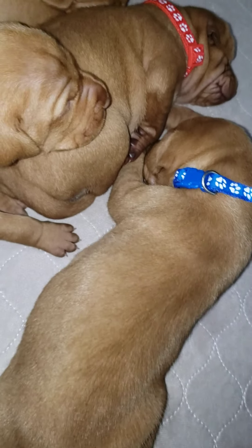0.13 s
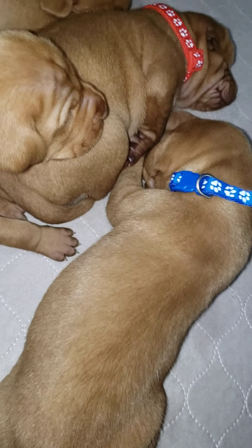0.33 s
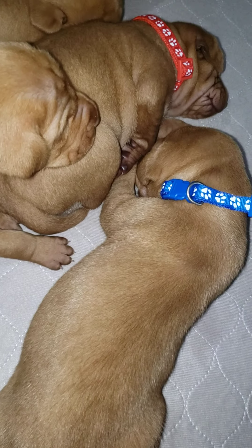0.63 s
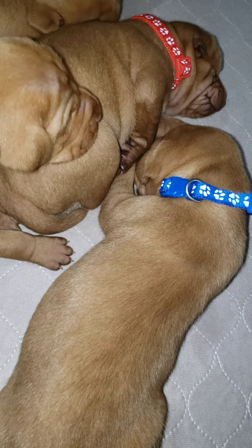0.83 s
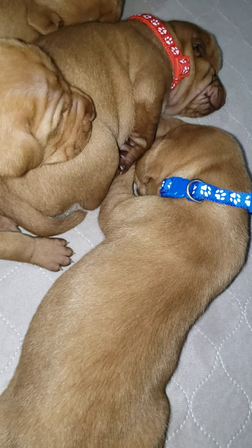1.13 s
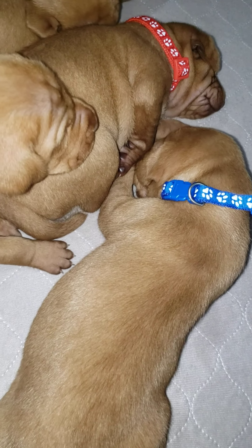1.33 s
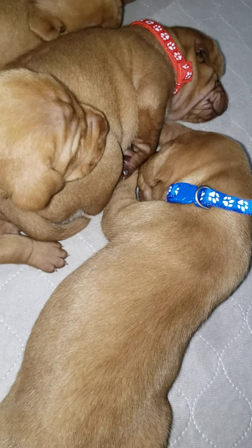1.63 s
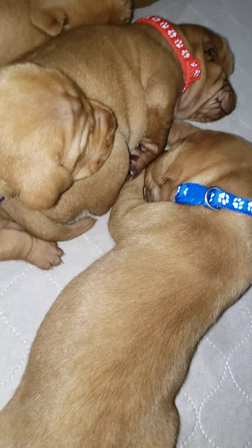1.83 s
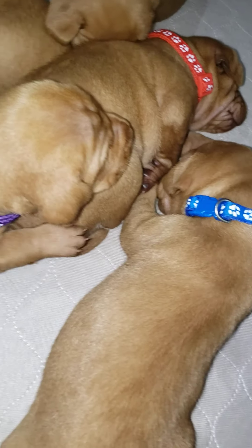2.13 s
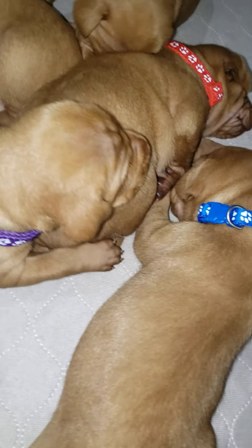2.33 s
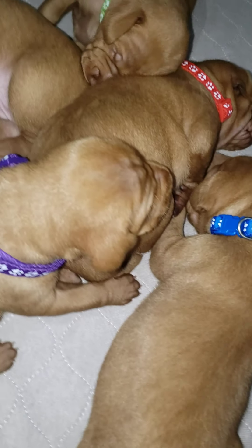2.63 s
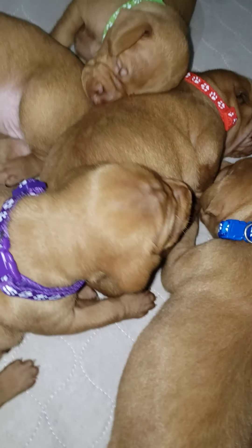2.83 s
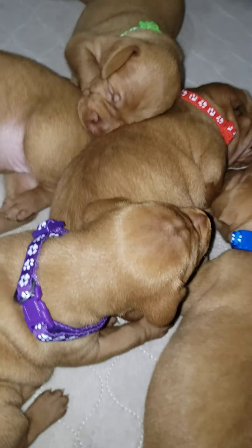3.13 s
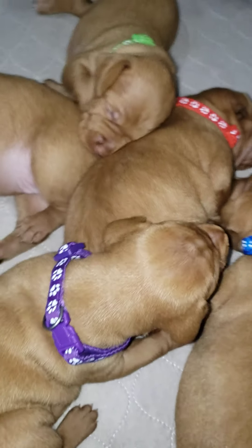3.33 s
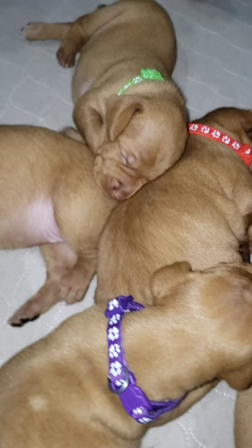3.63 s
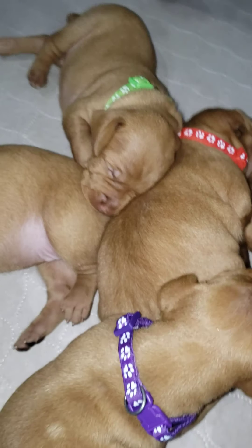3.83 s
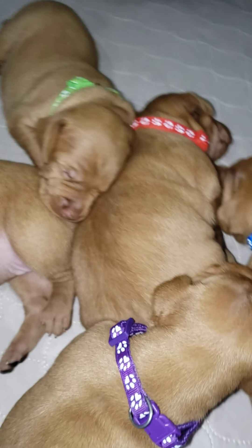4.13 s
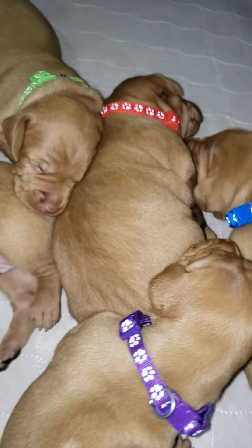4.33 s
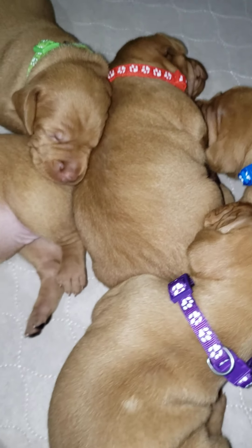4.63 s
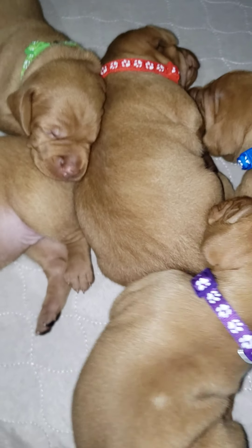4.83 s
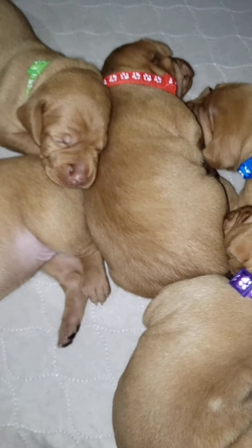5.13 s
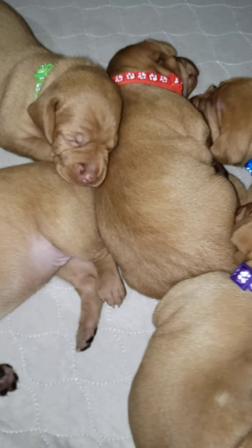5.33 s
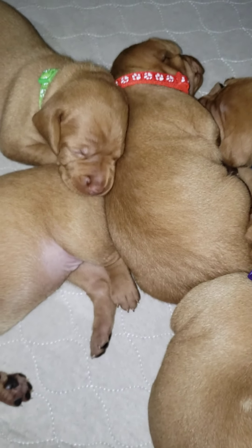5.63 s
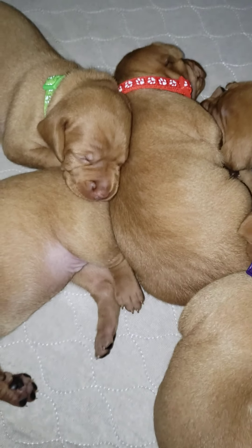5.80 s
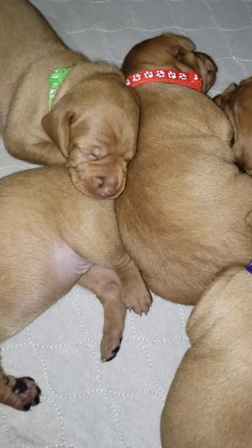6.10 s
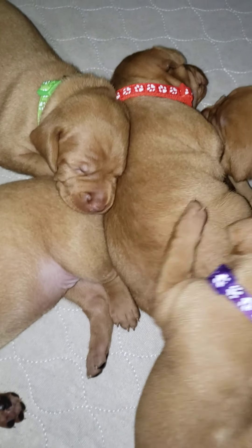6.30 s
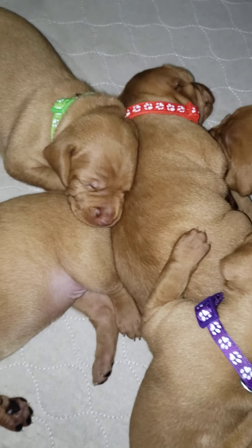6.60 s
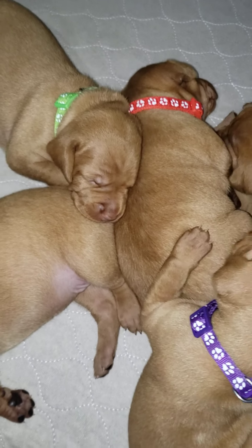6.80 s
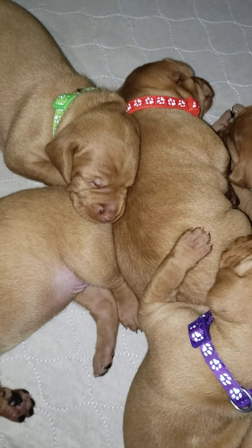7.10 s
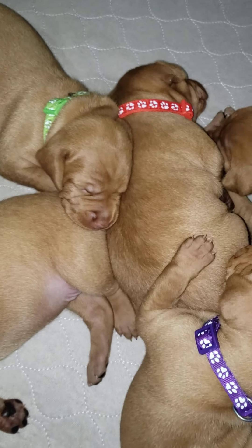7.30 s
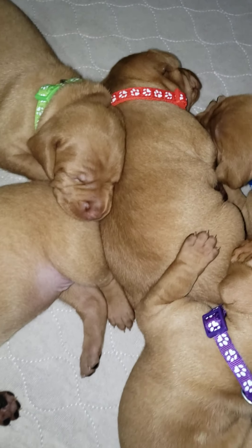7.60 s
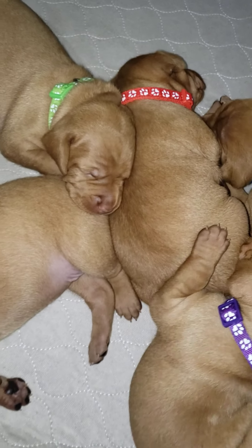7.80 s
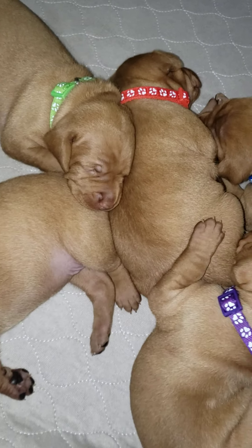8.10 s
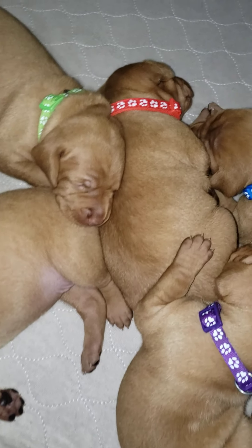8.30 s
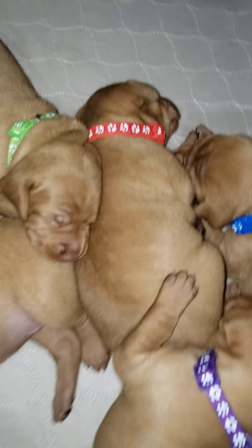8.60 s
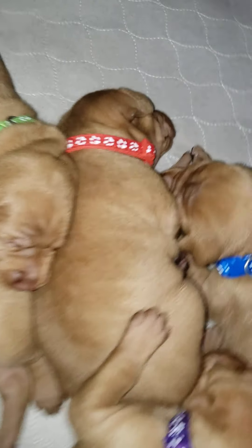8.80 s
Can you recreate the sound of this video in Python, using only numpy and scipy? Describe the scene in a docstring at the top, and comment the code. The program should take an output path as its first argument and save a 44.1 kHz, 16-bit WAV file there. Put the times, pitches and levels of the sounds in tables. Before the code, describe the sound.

Very young puppies lie close to a hand-held phone in a small quiet room. Soft low grunts come first, then a whine and a louder one that breaks and quavers, just as a finger judders over the phone. Small whimpers and fur rustles follow, then a run of short, thin, falling squeaks. A low appliance hum and faint hiss stay underneath.

```python
"""Newborn puppies whimper and squeak on a quilt in a small quiet room, just below a hand-held phone.
Each cry is a sum of harmonics bending in pitch, coloured by a tiny throat and rasped by leaking air;
a second pup grunts in between. Mouth clicks and collar ticks are noise bursts in a resonance.
A delayed near-wall echo ripples their level and a noise tail gives the room. A finger judders once
across the phone near its right port, skin, fur and bedding rustle as shaped noise, an appliance hums."""
import sys
import numpy as np
from scipy import signal
from scipy.fft import rfft, irfft, next_fast_len
from scipy.io import wavfile
from scipy.ndimage import uniform_filter1d

SR = 44100
rng = np.random.default_rng(int(sys.argv[2]) if len(sys.argv) > 2 else 0)


def unload_wav(signal):
    """Save mono or channel-first audio to the path in sys.argv[1] as 16-bit WAV at rate SR, clipped to [-1, 1]."""
    wavfile.write(
        sys.argv[1],
        SR,
        np.round(np.clip(np.atleast_2d(signal).T, -1, 1) * 32767).astype(np.int16),
    )


N = 394674
T = np.arange(N) / SR
SIZE = next_fast_len(N, True)
FREQS = np.fft.rfftfreq(SIZE, 1 / SR)
TOP_HZ = 15850  # upper limit of the phone


def undb(db):
    """Decibels to gain."""
    return 10 ** (np.asarray(db) / 20)


def unit(x):
    """Scale to rms 1."""
    return x / np.sqrt(np.mean(x ** 2))


def curve(rows):
    """Gain over time from (s, dB) rows."""
    return undb(np.interp(T, *np.transpose(rows)))


def colour_db(points, hz):
    """Level of a (Hz, dB) spectrum, interpolated over log frequency."""
    f, db = np.transpose(points)
    return np.interp(np.log(hz + 1e-9), np.log(f), db)


def colour(points, hz):
    """Gain of a (Hz, dB) spectrum at the given frequencies."""
    return undb(colour_db(points, hz))


def shape(x, gain):
    """Filter by a frequency response."""
    return irfft(rfft(x, SIZE) * gain, SIZE)[..., :N]


def resonance(hz, width_hz):
    """Response of one resonance, gain 1 at its centre."""
    return 1j * FREQS * width_hz / (hz ** 2 - FREQS ** 2 + 1j * FREQS * width_hz)


def wander(rate_hz, size=N):
    """Smooth random movement through rate_hz knots a second, scaled toward unit spread."""
    knots = rng.standard_normal(size // 16 + 2)
    return 0.83 * np.interp(np.arange(size) * rate_hz / SR, np.arange(len(knots)), knots)


def pan(x, left_minus_right_db):
    """Place a sound by its level difference, keeping its power."""
    left = 1 / (1 + undb(-left_minus_right_db) ** 2)
    return x * np.sqrt(2 * np.array([left, 1 - left])).reshape(2, -1)


def arch(start_s, top_s, end_s, start_hz, top_hz, end_hz, fall, count=48):
    """Times, pitch and progress of a bend through a rounded top; a high fall exponent holds it longer."""
    t = np.linspace(start_s, end_s, count)
    rising = np.clip((top_s - t) / max(top_s - start_s, 1e-4), 0, 1)
    falling = np.clip((t - top_s) / max(end_s - top_s, 1e-4), 0, 1)
    hz = top_hz + (start_hz - top_hz) * rising ** 2 + (end_hz - top_hz) * falling ** fall
    return t, hz, np.linspace(0, 1, count)


PRESS_DB = -16  # higher harmonics start this much weaker and grow as the pup presses

# Mouth resonance on the second harmonic. Each row: its frequency in Hz, level re fundamental in dB.
MOUTH_RESONANCE = [(1000, -7.5), (1300, -8), (1750, 2), (2100, -11), (2500, -12), (3000, -21), (3400, -42),
                   (3800, -39)]
# Arched squeaks. Each row: start, top and end in seconds, start, top and end pitch in Hz, fall exponent,
# level in dB, higher harmonics in dB before trims, left minus right in dB, hoarseness (clipped to 0-1).
SQUEAK_ROWS = [ (5.864, 5.884, 5.962, 1107, 1080, 767, 1.76, -50, -61.5, -.5, 0.84),
               (6.199, 6.201, 6.265, 1163, 1135, 576, 0.94, -49.5, -59.5, 0.5, 1.1),
               (6.465, 6.518, 6.626, 1090, 1189, 686, 0.93, -40.5, -51, -5.5, 0.07),
               (7.202, 7.276, 7.412, 1500, 1891, 786, 3.32, -36.5, -53.5, -1.5, 0.54),
               (7.571, 7.664, 7.812, 1581, 1852, 1056, 2.72, -39.5, -53.5, 3.5, 0.1),
               (7.952, 8.042, 8.215, 1266, 1740, 596, 1.4, -38.5, -52.5, 0.5, 0.13),
               (8.395, 8.416, 8.44, 888, 896, 710, 1.2, -43.5, -52, -2, 0.18),
               (8.679, 8.69, 8.718, 824, 811, 580, 0.75, -47, -47.5, 2, .8), ]


def squeak(row, soft_start_db=-8, swell_share=0.15):
    """A high cry swells, holds and grows richer as its pitch gives way."""
    *bend, db, higher_db, pan_db, hoarseness = row
    t, hz, progress = arch(*bend)
    level = db + soft_start_db * np.clip(1 - progress / swell_share, 0, 1)
    second = level + colour_db(MOUTH_RESONANCE, 2 * hz)
    higher = higher_db + PRESS_DB * (1 - progress) ** 2
    return t, hz, level, second, higher, pan_db, hoarseness


# Low whimpers and grunts. Each row: start, top and end in seconds, start, top and end pitch in Hz,
# fall exponent, fundamental in dB, its gain from start to end as the mouth closes in dB, second harmonic
# in dB, higher harmonics in dB before trims, left minus right in dB, hoarseness (0-1).
WHIMPER_ROWS = [ (.181, 0.209, .24, 408.5, 444.6, 349, 1.6, -62, 22, -49, -55.5, -4.5, 0.65),
                (1.039, 1.05, 1.066, 425, 394, 377, 1.8, -44, 0, -48, -55, -2, 0.2),
                (1.181, 1.21, 1.26, 410, 394, 341, 2, -54, 3.5, -75, -80, 2.5, 0.2),
                (1.386, 1.455, 1.508, 393, 458.3, 376, 3.5, -54, 7.5, -44.5, -53.5, -6, 0.08),
                (2.69, 2.791, 2.89, 461.4, 557, 425.4, 1.72, -40, -1, -40.5, -43, -1, 0.01),
                (3.144, 3.205, 3.232, 444.3, 523, 440, 1.2, -69, 10, -51, -54.5, -0.5, 0.27),
                (3.463, 3.527, 3.547, 399, 421.7, 332, 1.6, -62, 25, -56, -51, 3, 0.2),
                (3.81, 3.83, 3.845, 318, 325, 253, 1.5, -58.5, 20, -53, -58, 6, 0.74),
                (4.065, 4.125, 4.17, 347, 412.4, 277, 0.67, -59, 16, -55.5, -54, 8.5, 0.65),
                (4.691, 4.7, 4.725, 298, 317, 276, 1.6, -68.5, 0, -62.5, -64, 6, 0.6),
                (5.554, 5.575, 5.6, 295, 322.3, 311, 2.4, -66, -17, -54.5, -58.5, 4, 0.5),
                (6.798, 6.807, 6.88, 389, 350, 316, 0.5, -50.5, -5, -53, -62.5, 2.5, 0.3),
                (7.295, 7.323, 7.37, 422, 422, 332, 2.34, -53.5, 8, -55, -63, 4, 0.3),
                (7.94, 7.945, 7.975, 408, 393, 352, 2, -54.5, 6, -73, -70, 6, 0.3), ]


def whimper(row, edge_db=-7, edge_higher_db=-7.5):
    """A low cry is weaker at its edges; its fundamental shifts in level as the mouth closes."""
    *bend, first_db, closing_db, second_db, higher_db, pan_db, hoarseness = row
    t, hz, progress = arch(*bend)
    edge = (2 * progress - 1) ** 2 - 1 / 3  # zero mean, ends 1 above the middle
    first = first_db + edge_db * edge + closing_db * (progress - .5)
    second = second_db + edge_db * edge
    higher = higher_db + edge_higher_db * edge
    return t, hz, first, second, higher, pan_db, hoarseness


# Whines that catch or quaver on the way down, one list each.
# Each row: time in seconds, pitch in Hz, level in dB.
WHINE_CURVES = [
    [(1.752, 1226, -51.5), (1.797, 1527, -42), (1.83, 1417, -40.5), (1.868, 1422, -37.5),
     (1.885, 1236, -39), (1.897, 887, -39.5), (1.91, 770, -48.5)],
    [(2.097, 1193, -41), (2.125, 1418, -30), (2.15, 1553, -33), (2.215, 1218, -33), (2.26, 825, -37),
     (2.305, 710, -47), (2.325, 622.4, -31), (2.408, 570.6, -40), (2.43, 668, -29.5), (2.455, 630.4, -33),
     (2.478, 661, -34.5), (2.497, 581, -34.5), (2.518, 632, -36.5), (2.534, 488, -41.5)],
    [(6.83, 1175, -48.5), (6.85, 1190, -40), (6.875, 1467, -41), (6.895, 1488, -33.5), (6.915, 1372, -40),
     (6.932, 1168, -35), (6.955, 1013, -37.5), (7.007, 880, -35), (7.018, 667, -38.5)],
]


def whine(rows, higher_db=-14.5, pan_db=-3, hoarseness=.25):
    """A drawn-out squeak that follows its own curve of pitch and level."""
    t, hz, db = np.transpose(rows)
    progress = (t - t[0]) / (t[-1] - t[0])
    second = db + colour_db(MOUTH_RESONANCE, 2 * hz)
    higher = db + higher_db + PRESS_DB * (1 - progress) ** 2 / 2  # half the press of a squeak
    return t, hz, db, second, higher, pan_db, hoarseness


def fold_pitch(pitch, slack, rattle, jitter=0.0026, slack_jitter=.011, rattle_jitter=.04, rattle_waver=.018):
    """Slack folds vibrate less evenly than taut ones, and hoarse ones rattle: relative pitch jitter."""
    count = len(pitch)
    quiver = wander(900, count)
    unsteady = rattle * (rattle_jitter * quiver + rattle_waver * wander(72.8, count))
    return pitch * (1 + jitter * wander(112, count) + slack_jitter * slack * quiver + unsteady)


# Throat and nose on the higher harmonics. Each row: frequency in Hz, relative level in dB.
THROAT_COLOUR = [(900, 19.5), (1350, 10), (1800, 10.5), (2400, 4.5), (3400, -20), (5500, -14.5), (7000, -6),
                 (8200, -15.5), (9400, -15), (11300, -0.5), (13200, -13), (15500, -21.5)]


def throat_gains(overtones_hz, hz, slack, shrill, higher_db, upper_db=-1, nasal_db=-7, shrill_db=5):
    """Throat and nose set each higher harmonic's amplitude; slack folds feed the topmost less."""
    throat = colour(THROAT_COLOUR, overtones_hz) * (overtones_hz < TOP_HZ)
    # low grunts carry less thin nasal treble
    throat = throat * undb(nasal_db * (overtones_hz > 4000) * 500 / hz)
    # high squeaks ring the nose's top resonance harder
    throat = throat * undb(shrill_db * shrill * (overtones_hz > 8500))
    higher = throat / np.sqrt(np.sum(throat ** 2, axis=0)) * undb(higher_db + upper_db)
    higher = higher * (1 - .7 * slack * np.clip((overtones_hz - 2000) / 2000, 0, 1))
    # each harmonic flickers on its own
    flicker = wander(60, higher.size).reshape(higher.shape)
    return higher * undb(2.5 * flicker - 1)


# Right-port lag of the cries as the pups turn their heads. Each row: time in seconds, lag in seconds.
PORT_LAG_CURVE = [(0.2, 0.00013), (1.05, 0.00018), (1.4, 0.00023), (2.1, 0.00025), (3.5, 0.00023),
                  (6.83, 0.00032), (7.2, 0.00043), (7.57, .00014), (7.95, 0.00032)]


def cry(s, pitch, first_db, second_db, higher_db, pan_db, hoarseness, taut_hz=1400, glide_s=.006,
        attack_s=.007, release_s=0.0061, shimmer_db=3.5, collapse_s=0.1, flutter_db=1.5,
        rattle_flutter_db=3, slack_rasp_db=9, shrill_rasp_db=4):
    """Folds make 40 harmonics and leak air: high squeaks are nearly pure, low whines waver and rasp."""
    start, end = s[0] - attack_s, s[-1] + release_s
    span = slice(int(start * SR), int(end * SR))
    t = T[span]
    lag_s = np.interp(start, *np.transpose(PORT_LAG_CURVE))
    pitch, first_db, second_db, higher_db = (
        uniform_filter1d(np.interp(t, s, control), int(glide_s * SR), mode="nearest")
        for control in (pitch, first_db, second_db, higher_db))

    slack = 1 / (1 + (pitch / taut_hz) ** 6)
    shrill = np.clip(pitch / 500 - 1, 0, 1)
    rattle = np.clip(hoarseness, 0, 1) * slack
    hz = fold_pitch(pitch, slack, rattle)
    k = np.arange(1, 41)[:, None]
    higher = throat_gains(k[2:] * hz, hz, slack, shrill, higher_db)
    amplitudes = np.vstack([undb(first_db), undb(second_db), higher])

    gate = np.clip((t - start) / attack_s, 0, 1) * np.clip((end - t) / release_s, 0, 1)
    # the folds flutter hardest while the pitch collapses
    collapse = np.clip(-np.gradient(np.log(pitch)) * SR * collapse_s, 0, 1)
    flutter = flutter_db * slack * collapse ** 2 + rattle_flutter_db * rattle
    gate = gate * undb(shimmer_db * wander(117.7, len(t)) + flutter * wander(600, len(t)))

    phase = 2 * np.pi * np.cumsum(hz) / SR
    voice, air = np.zeros((2, N)), np.zeros(N)
    for port, lag in enumerate((0, lag_s)):
        harmonics = np.sin(k * (phase - 2 * np.pi * hz * lag))
        voice[port, span] = np.sqrt(2) * np.sum(amplitudes * harmonics, axis=0) * gate
    voice[:, span] = pan(voice[:, span], pan_db)
    # air leaks once a cycle, more through slack folds
    leak_db = higher_db + slack_rasp_db * (slack - 2.5) + shrill_rasp_db * shrill * slack
    air[span] = undb(leak_db) * gate * (1 + np.cos(phase))
    return voice, air


def puppies(rasp_bright_db=8):
    """All cries; leaking air makes noise that passes through the same throat, brightened."""
    voice, air = 0, 0
    cries = [*map(squeak, SQUEAK_ROWS), *map(whimper, WHIMPER_ROWS), *map(whine, WHINE_CURVES)]
    for controls in cries:
        tone, leak = cry(*controls)
        voice, air = voice + tone, air + leak
    bright = undb(rasp_bright_db * FREQS / TOP_HZ)
    bass_cut = FREQS / (FREQS + 500)
    gain = colour(THROAT_COLOUR, FREQS) * bright * bass_cut
    rasp = shape(air * rng.standard_normal((2, N)), unit(gain))
    return voice + rasp


# Wet mouth clicks and collar ticks.
# Each row: start in seconds, peak before panning in dB, centre in Hz, decay in seconds.
TICK_ROWS = [(.394, -51.5, 2230, 0.00078), (1.09, -63.5, 5900, 0.0022), (2.73, -42, 3265, 0.012),
             (2.785, -46, 4200, 0.009), (3.638, -63, 1500, .002), (3.771, -51.5, 2280, 0.0039),
             (4.883, -53, 14900, 0.034), (4.879, -50.5, 3500, 0.014), (8.59, -55, 1150, 0.0014)]


def ticks(relative_width=0.28, pan_db=-6):
    """Small clicks, each a decaying noise burst in one broad resonance."""
    out = 0
    for s, db, hz, decay_s in TICK_ROWS:
        decay = np.exp(-np.clip((T - s) / decay_s, 0, 20))
        burst = rng.standard_normal(N) * (T > s) * decay
        click = shape(burst, resonance(hz, hz * relative_width))
        out = out + undb(db) * click / np.max(np.abs(click))
    return pan(out, pan_db)


def pen_wall(x, left_s=0.00393, right_s=0.002434, left_db=-10, right_db=-7, dull_hz=4000):
    """A near wall echoes to each port; a gliding cry ripples as the echo adds and cancels."""
    delay_s = np.array([[left_s], [right_s]])
    echo = undb([[left_db], [right_db]]) * np.exp(-2j * np.pi * FREQS * delay_s)
    return shape(x, echo / (1 + (FREQS / dull_hz) ** 2))


def room(x, wet_db=-13, t60_s=0.55, dull_hz=3500, early_db=-15, early_s=0.026):
    """Near reflections from the pen and the room's short tail: decaying noise, dulled."""
    t = T[:SR // 2]
    noise = rng.standard_normal((2, 2, len(t))) * (t > .003)
    tail = noise[0] * undb(-60 * t / t60_s)
    early = noise[1] * np.exp(-t / early_s)
    response = (undb(wet_db) * unit(tail) + undb(early_db) * unit(early)) / np.sqrt(len(t))
    wet = signal.fftconvolve(x, response, axes=1)[:, :N]
    return shape(wet, 1 / (1 + 1j * FREQS / dull_hz))


# Finger on the case, sticking and slipping.
# Each row: time in seconds, strength before trims in dB, tick before panning in dB.
SLIP_ROWS = [(1.9175, -27, -42), (1.9579, -21, -23), (1.9805, -20, -23.5), (2.0007, -19.5, -22),
             (2.0198, -19, -22), (2.0386, -18.5, -23), (2.0565, -19.5, -19.5), (2.0755, -19, -21.5),
             (2.0927, -20, -22), (2.1088, -21, -21.5)]
# Skin on the phone. Each row: frequency in Hz, relative level in dB.
SKIN_COLOUR = [(300, -0.5), (1000, -4.5), (2500, -8), (4500, -5.5), (5900, -3.5), (7800, -11), (9500, -4.5),
               (12200, -15), (13500, -6.5), (14700, 3.5), (15800, -24)]


def judder(case_hz=84, case_db=-0.5, swell_s=0.0037, give_s=0.00042,
           panel_hz=240, panel_db=-15, panel_s=0.0069, tick_s=0.00013,
           fizz_db=-24, fizz_s=0.0017, pan_db=-14):
    """Each slip snaps a tick, rocks the case, rings a panel and fizzes while the skin slides."""
    knock, slide = np.zeros(N), np.zeros(N)
    for s, db, tick_db in SLIP_ROWS:
        span = slice(int(s * SR) - SR // 200, int(s * SR) + SR // 20)
        t = T[span] - s
        late = np.maximum(t - give_s, 0)
        swell = late / swell_s * np.exp(1 - late / swell_s)
        knock[span] += undb(tick_db) * np.exp(-(t / tick_s) ** 2)
        knock[span] -= undb(db + case_db) * np.sin(2 * np.pi * case_hz * late) * swell
        knock[span] -= undb(db + panel_db) * np.sin(2 * np.pi * panel_hz * late) * np.exp(-late / panel_s)
        since = np.maximum(t, 0) / fizz_s
        slide[span] += undb(db + fizz_db) * since * np.exp(1 - since)
    skin = unit(shape(rng.standard_normal(N), colour(SKIN_COLOUR, FREQS)))
    return pan(knock + slide * skin, pan_db)


def friction(gain, grain_db=2.0, flutter_db=2.5):
    """Countless tiny catches: noise of uneven level ringing the given response."""
    uneven = undb(grain_db * wander(900) + flutter_db * wander(25))
    return unit(shape(rng.standard_normal((2, N)) * uneven, gain))


# Skin sliding on the phone. Each row: time in seconds, level in dB.
GRIP_LEVEL = [(0, -112), (1.7, -99), (1.93, -69.5), (2.1, -54), (2.25, -49), (2.5, -54), (2.85, -56.5),
              (2.97, -66.5), (3.3, -72.5), (3.6, -64), (4.0, -105), (8.4, -82), (8.95, -72)]
# Fur on the quilt. Each row: frequency in Hz, relative level in dB.
FUR_SPECTRUM = [(300, 0.5), (1200, -2.5), (2600, 1), (4200, -1), (6000, -5), (8500, -10.5), (11000, -14),
                (13500, -6.5), (15600, -1.5)]
# Strokes of fur. Each row: peak time in seconds, level in dB, rise in seconds, fall in seconds.
FUR_STROKES = [(.42, -63.5, 0.033, 0.034), (1.4, -68, 0.032, 0.094), (2.9, -57.5, 0.46, 0.32),
               (3.65, -65, 0.17, 0.52), (4.55, -55, 0.21, 0.28), (5.4, -67.5, 0.12, 3.6),
               (6.75, -71, 0.22, 0.87), (7.9, -61, 0.094, 0.43), (8.79, -58, 0.035, 0.052)]


def rustles(grip_pan_db=-15, fur_pan_db=-8):
    """Skin on the phone, and fur on the quilt in strokes that swell and fade."""
    grip = friction(colour(SKIN_COLOUR, FREQS)) * curve(GRIP_LEVEL)
    power = 0
    for s, db, rise_s, fall_s in FUR_STROKES:
        stroke = undb(db) * np.exp(-np.maximum((s - T) / rise_s, (T - s) / fall_s))
        power = power + stroke ** 2
    fur = friction(colour(FUR_SPECTRUM, FREQS)) * np.sqrt(power)
    return pan(grip, grip_pan_db) + pan(fur, fur_pan_db)


# Appliance hum. Each row: frequency in Hz, rms level before waver in dB.
HUM_TONES = [(59.2, -62.5), (118.4, -62.5)]
# Room air and microphone hiss. Each row: frequency in Hz, density in dB per Hz.
AIR_SPECTRUM = [(20, -107.5), (55, -71), (80, -78), (120, -75), (160, -89.5), (200, -84.5), (300, -101),
                (500, -107), (730, -102), (1200, -112), (4000, -119), (8500, -129), (12000, -121),
                (15500, -117)]


def background(hum_waver_db=1.5, shared_hz=400):
    """Wavering hum sines over shaped-noise room air; the bass is alike at both ports."""
    hum = 0
    for hz, db in HUM_TONES:
        level = np.sqrt(2) * undb(db + hum_waver_db * wander(5))
        hum = hum + level * np.sin(2 * np.pi * hz * T + 0.39 * wander(4))
    apart = np.clip(FREQS / (FREQS + shared_hz), 0, 1)
    shared = shape(rng.standard_normal(N), np.sqrt(1 - apart ** 2))
    separate = shape(rng.standard_normal((2, N)), apart)
    return hum + shape(shared + separate, colour(AIR_SPECTRUM, FREQS) * np.sqrt(SR / 2))


def scene():
    """The litter in its room, the hand on the phone, the rustling and the background."""
    litter = puppies() + ticks()
    return litter + pen_wall(litter) + room(litter) + judder() + rustles() + background()


def record(dry):
    """The phone thins the deepest bass and cuts the top."""
    bass_cut = signal.butter(1, 28, "high", fs=SR, output="sos")
    top_cut = signal.ellip(10, .2, 70, TOP_HZ, fs=SR, output="sos")
    return signal.sosfilt(top_cut, signal.sosfilt(bass_cut, dry))


dry = scene()
out = record(dry)
unload_wav(out)
```